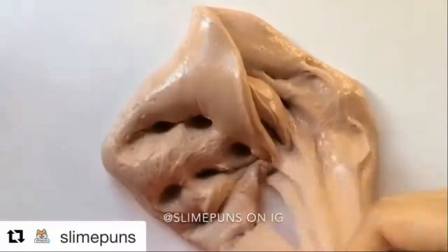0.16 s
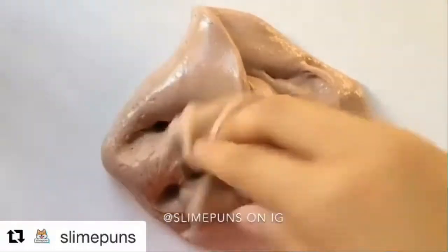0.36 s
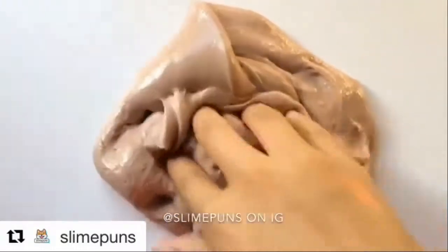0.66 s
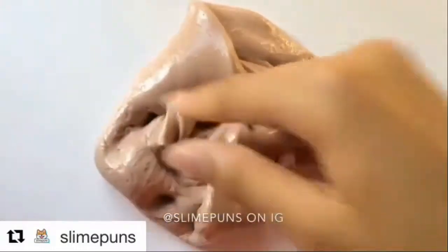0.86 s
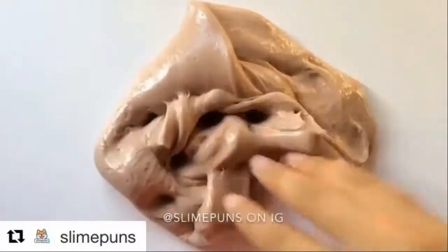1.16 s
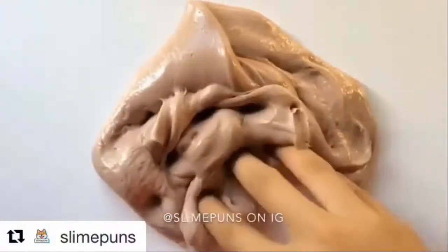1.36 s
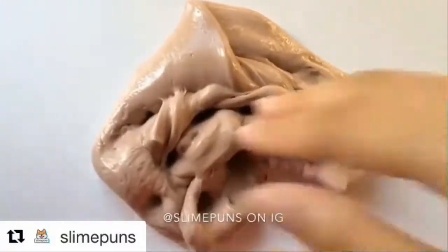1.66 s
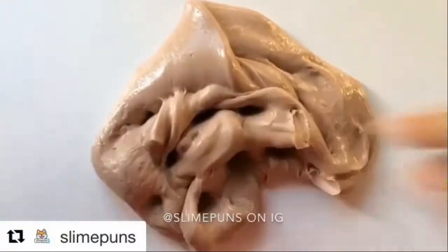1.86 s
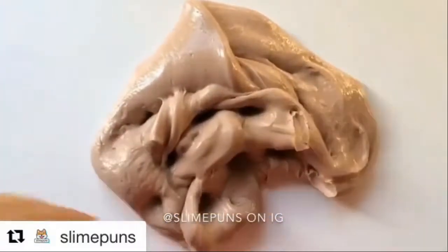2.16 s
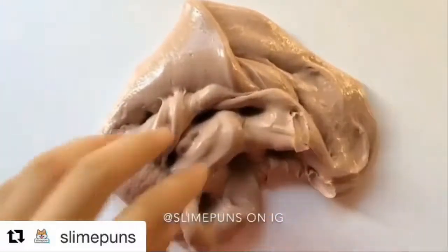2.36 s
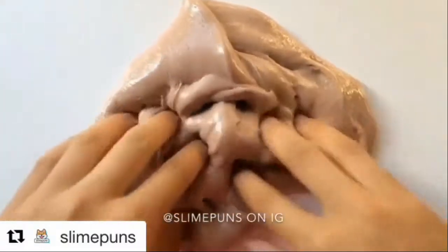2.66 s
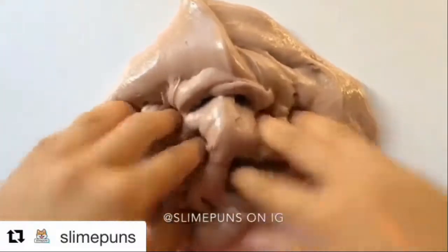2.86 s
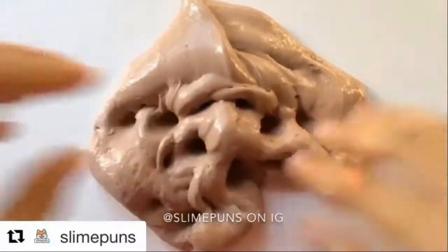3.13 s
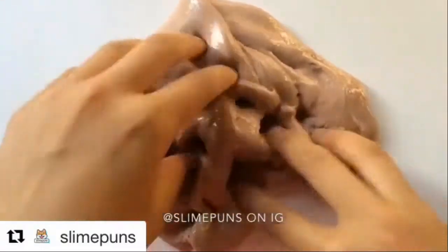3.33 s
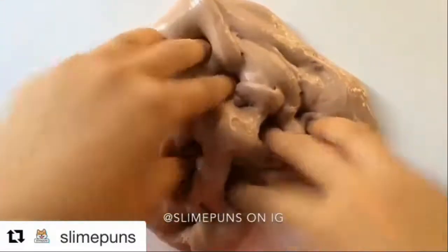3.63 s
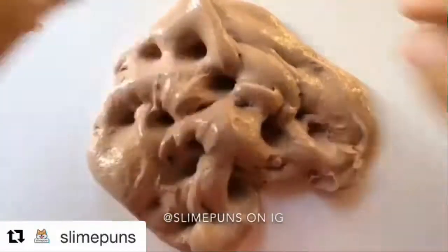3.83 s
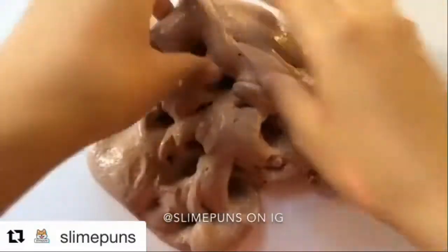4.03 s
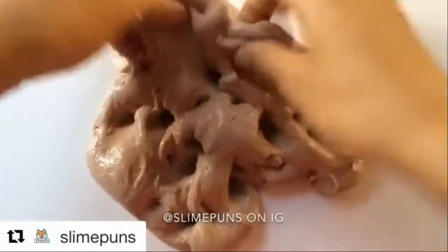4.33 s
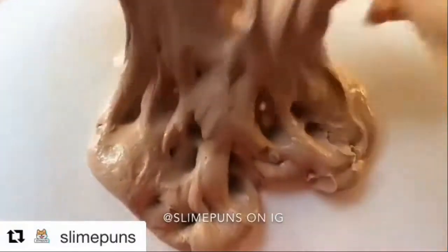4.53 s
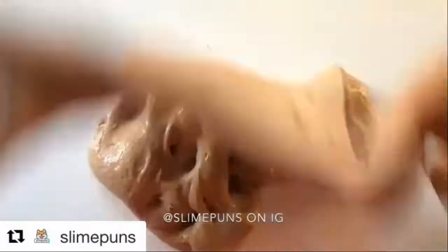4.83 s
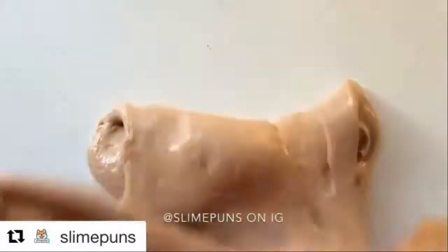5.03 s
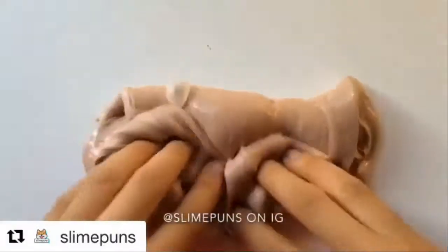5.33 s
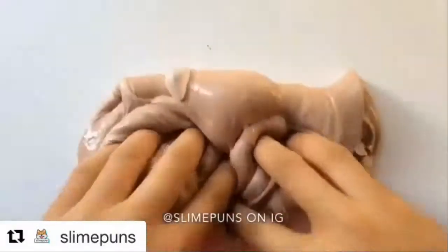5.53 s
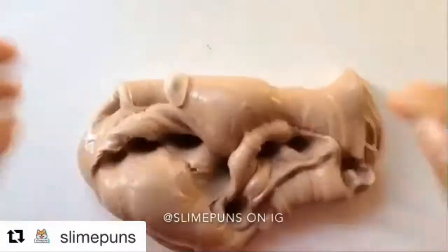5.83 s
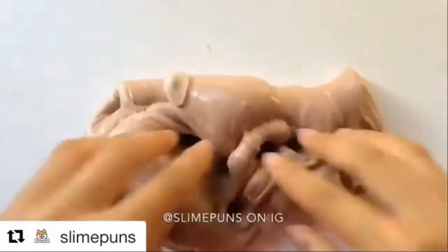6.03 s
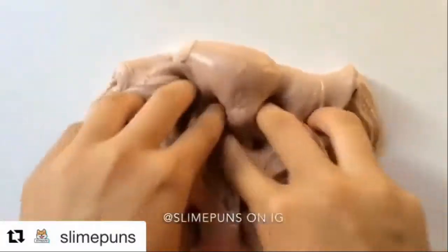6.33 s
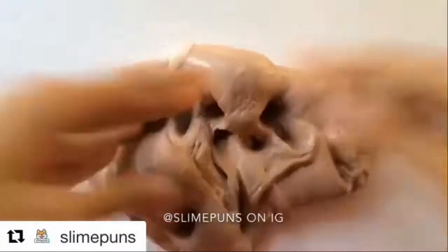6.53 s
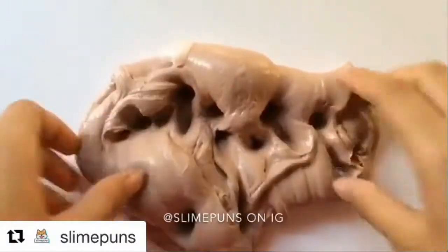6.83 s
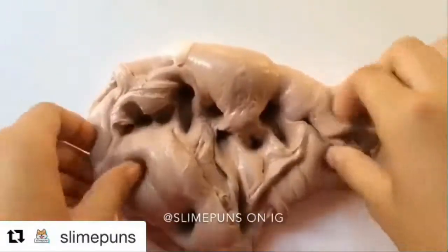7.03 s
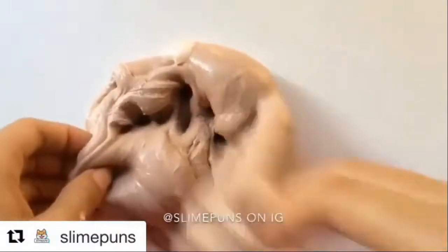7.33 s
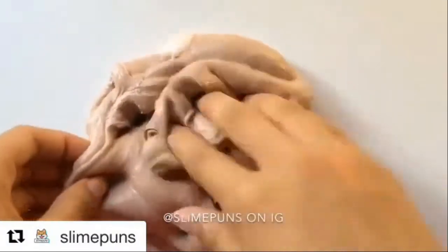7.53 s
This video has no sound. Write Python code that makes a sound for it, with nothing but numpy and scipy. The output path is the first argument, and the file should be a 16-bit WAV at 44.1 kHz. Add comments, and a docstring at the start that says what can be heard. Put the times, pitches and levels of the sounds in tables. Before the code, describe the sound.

Close wet snaps, plops and sticky crackles come in brief clusters as fingers squish dense slime, the loudest ending in a low thump.

```python
"""Air pockets burst in quick volleys as fingers poke, fold and stretch thick slime on a table.
Each pop is a film snap (damped ring plus noise) over a pocket plop (drifting damped rings).
Gulps are hollow rings with a noise gurgle; thuds are low rings; tears and smears are shaped clicks and bubbles.
A faint ring of something hard, a small room and quiet room tone lie behind, nearly mono."""
import sys
import numpy as np
from scipy import signal
from scipy.fft import rfft, irfft, next_fast_len
from scipy.io import wavfile
from scipy.ndimage import map_coordinates

SR = 44100
rng = np.random.default_rng(int(sys.argv[2]) if len(sys.argv) > 2 else 0)


def waveform_to_disk(signal):
    """Save audio, clipped to [-1, 1], as 16-bit WAV at the path in sys.argv[1]."""
    frames = np.transpose(np.atleast_2d(signal))
    scaled = np.clip(frames, -1, 1) * 32767
    samples = np.round(scaled).astype(np.int16)
    wavfile.write(sys.argv[1], SR, samples)


N = 338688  # samples


def amp(db):
    """Amplitude ratio of a level in dB."""
    return 10 ** (np.asarray(db) / 20)


def unit(x):
    """Scale to rms 1."""
    return x / np.sqrt(np.mean(x ** 2) + 1e-20)


def burst(x):
    """Scale to the energy of 1 ms at rms 1."""
    return x * np.sqrt(SR / 1000 / (np.sum(x ** 2) + 1e-20))


def along(points, hz):
    """Read (hz, value) points on a log frequency axis."""
    point_hz, value = np.transpose(points)
    return np.interp(np.log(hz + 1), np.log(point_hz + 1), value)


def filtered(x, response):
    """Multiply the spectrum of x by a function of frequency."""
    n = x.shape[-1]
    fft_size = next_fast_len(2 * n)
    spectrum = rfft(x, fft_size) * response(np.fft.rfftfreq(fft_size, 1 / SR))
    return irfft(spectrum, fft_size)[..., :n]


def coloured(x, spectrum):
    """Shape x by a (hz, level_db) curve, at rms 1."""
    return unit(filtered(x, lambda hz: amp(along(spectrum, hz))))


def add(track, start_s, sound):
    """Mix a sound into the track from start_s."""
    i = max(round(start_s * SR), 0)
    track[i:i + len(sound)] += sound[:max(N - i, 0)]


def ring(hz, t60_s, swell_s, drift_oct=0):
    """Damped resonance with a smooth swell; pitch glides drift_oct over the first 10 ms, then holds."""
    t = np.arange(SR // 4) / SR
    pitch_hz = hz * 2 ** (drift_oct * np.minimum(t * 100, 1))
    envelope = amp(-60 * t / t60_s) * (1 - np.exp(-t / swell_s)) ** 2
    return burst(np.sin(2 * np.pi * np.cumsum(pitch_hz) / SR) * envelope)


# room tone spectrum, relative: freq_hz, density_db_per_hz
FLOOR_SPECTRUM = [(15, -51), (25, -12.5), (50, -6.5), (129, -0.5), (286, -14), (414, -16.5), (498, -18.5),
                  (569, -19.5), (781, -19.5), (868, -22.5), (1100, -23), (2500, -26.5), (2940, -27),
                  (5120, -29.5), (14000, -32.5)]


def room_tone(wavers_per_s=7):
    """Faint hiss over a rumble whose level wavers a little."""
    tone = coloured(rng.standard_normal(N), FLOOR_SPECTRUM)
    rumble = filtered(tone, lambda hz: 1 / (1 + (hz / 400) ** 4))
    knots = rng.standard_normal(int(N * wavers_per_s / SR) + 4)
    waver = amp(1.3 * map_coordinates(knots, [np.arange(N) * wavers_per_s / SR]))
    return amp(-66.5) * (tone + (waver - 1) * rumble)


# room decay: freq_hz, t60_s
ROOM_DECAY = [(60, 0.49), (150, 0.43), (300, 0.15), (800, 0.15), (2000, 0.13), (6000, 0.1), (14000, 0.13)]
# room colour: freq_hz, gain_db
ROOM_COLOUR = [(40, -7.5), (120, 1), (300, -1.5), (700, -1), (1200, -0.5), (3000, -1.5), (7000, -2.5),
               (14000, 0.5)]


def room_tail(onset_s):
    """Diffuse answer of the walls: noise decaying per frequency, the bass lingering longest."""
    hz, t, bins = signal.stft(rng.standard_normal(SR // 2), SR, nperseg=256)
    decay = amp(-60 * t / along(ROOM_DECAY, hz)[:, None])
    tail = signal.istft(bins * decay, SR, nperseg=256)[1]
    tail = filtered(tail / np.linalg.norm(tail), lambda f: amp(along(ROOM_COLOUR, f)))
    return tail * (1 - np.exp(-np.arange(len(tail)) / SR / onset_s))


def room(x, count=16):
    """Room reverberation, with a new random tail for each equal time slice."""
    wet = np.zeros(N)
    for part in np.array_split(np.arange(N), count):
        add(wet, part[0] / SR, signal.fftconvolve(x[part], room_tail(onset_s=0.0035)))
    return wet


SYMPATHY_START_S = 1.473
# modes of something hard nearby: pitch_hz, level_db, t60_s
SYMPATHY_MODES = [(705, -57, .6), (786, -67, 2.6), (1712, -63, .9), (4724, -70, .5)]


def sympathy():
    """Something hard rings faintly in sympathy: damped sines starting together, cut at 2 s."""
    track = np.zeros(N)
    t = np.arange(2 * SR) / SR
    for pitch_hz, level_db, t60_s in SYMPATHY_MODES:
        add(track, SYMPATHY_START_S, amp(level_db - 60 * t / t60_s) * np.sin(2 * np.pi * pitch_hz * t))
    return track


# slabs slumping on the table and air puffed at the microphone: start_s, level_db (1 ms energy), pitch_hz, t60_s
THUD_EVENTS = [(0.805, -35.5, 112, 0.45), (1.14, -38.5, 189.5, 0.38), (1.479, -36, 135.8, 0.084),
               (1.69, -30.5, 109.6, .1), (3.078, -23.5, 115.2, 0.14), (3.655, -37, 117.7, 0.11),
               (3.868, -26.5, 85.5, 0.11), (4.665, -40, 130.6, 0.17), (4.699, -36.5, 75, 0.2),
               (6.6129, -5.5, 54.2, 0.08), (6.6258, -7.5, 99.3, 0.0054)]


def thuds():
    """Low blows, each one damped resonance."""
    track = np.zeros(N)
    for start_s, level_db, pitch_hz, t60_s in THUD_EVENTS:
        add(track, start_s, amp(level_db) * ring(pitch_hz, t60_s, swell_s=0.00029))
    return track


def bubbles(per_s, centre_hz, spread_db):
    """Stream of tiny bubbles: damped sines of random pitch and size, at rms 1."""
    track = np.zeros(N)
    draws = rng.standard_normal((int(per_s * N / SR), 3))
    for k, (late, size, pitch) in enumerate(draws):
        pitch_hz = centre_hz * np.exp(0.59 * np.clip(pitch, -2.5, 2.5))
        cycles = np.arange(SR // 50) * pitch_hz / SR
        blip = np.sin(2 * np.pi * cycles) * np.exp(-cycles / 3) * (1 - np.exp(-2 * cycles))
        add(track, (k + late) / per_s, amp(spread_db * min(size, 2)) * blip)
    return unit(track)


def grains(per_s, spread_db):
    """Single-sample clicks at random times, of very uneven size, at rms 1."""
    hits = rng.random(N) < per_s / SR
    size = amp(spread_db * np.minimum(rng.standard_normal(N), 2))
    return unit(hits * rng.choice([-1, 1], N) * size)


FADE_DB = 20  # span of attack_s and release_s


def strokes(rows, attack_s, sag_db_per_s):
    """Gain of finger strokes: builds up to start_s, sags as the slime yields, lets go after hold_s."""
    gain = np.zeros(N)
    for start_s, hold_s, level_db, release_s in rows:
        t = np.arange(N) / SR - start_s
        fade = np.maximum(-t, 0) / attack_s + np.maximum(t - hold_s, 0) / release_s
        gain += amp(level_db - sag_db_per_s * np.maximum(t, 0) - FADE_DB * fade)
    return gain


# fingers tear free: start_s, hold_s, level_db (before layer gains), release_s
TEAR_STROKES = [(.908, 0.023, -36.5, 0.11), (1.683, .033, -34.5, .035), (3.03, 0.09, -38, 0.069),
                (3.789, 0.075, -36.5, 0.044), (5.781, 0.074, -36.5, 0.065), (6.597, 0.082, -45, 0.067)]
TEAR_ATTACK_S, TEAR_SAG_DB_PER_S = 0.012, 15
# skin smears over slime: start_s, hold_s, level_db (before layer gains), release_s
SMEAR_STROKES = [(.15, 0.067, -63.5, 0.073), (.815, .025, -60.5, 0.096), (1.07, 0.065, -61.5, 0.085),
                 (2.71, 0.0038, -62, 0.029), (4.225, 0.014, -56, 0.031), (4.47, 0.081, -51.5, 0.045),
                 (4.68, 0.0085, -62.5, 0.033), (5.035, 0.042, -59.5, 0.079), (7.305, 0.038, -51.5, 0.082)]
SMEAR_ATTACK_S, SMEAR_SAG_DB_PER_S = 0.033, 13.5
# wet crackle of tearing, relative: freq_hz, density_db_per_hz
CRACKLE_SPECTRUM = [(100, -17), (350, 5.5), (750, 1), (1600, 0.5), (3000, -0.5), (6500, 0), (10000, -7.5),
                    (14000, -13.5)]
# wobbling mass, relative: freq_hz, density_db_per_hz
SHUDDER_SPECTRUM = [(30, -12.5), (60, -2), (130, 0.5), (250, -3.5), (500, -12), (1200, -30), (4000, -69)]
# smearing, relative: freq_hz, density_db_per_hz
SMEAR_SPECTRUM = [(200, -12), (500, -6), (1050, -2), (1400, -8), (2050, -2.5), (3000, -9.5), (5000, -10.5),
                  (14000, -16.5)]


def squelch():
    """Threads part as clicks, bubbles froth, and the released mass shudders as low noise."""
    pull = strokes(TEAR_STROKES, TEAR_ATTACK_S, TEAR_SAG_DB_PER_S)
    slide = strokes(SMEAR_STROKES, SMEAR_ATTACK_S, SMEAR_SAG_DB_PER_S)
    tearing = pull * coloured(grains(per_s=2000, spread_db=4), CRACKLE_SPECTRUM)
    shudder = pull * coloured(rng.standard_normal(N), SHUDDER_SPECTRUM)
    smearing = slide * coloured(grains(per_s=850, spread_db=5.5), SMEAR_SPECTRUM)
    froth = bubbles(per_s=170, centre_hz=1300, spread_db=4.5)
    frothing = (amp(-10) * pull + amp(-7.5) * slide) * froth
    return amp(-3) * tearing + amp(-2.5) * shudder + amp(-5.0) * smearing + frothing


# hollow, slower gulps, alone or under a pop:
# start_s, level_db (1 ms energy), pitch_hz, swell_s, t60_s, drift_oct_per_10ms
GULP_EVENTS = [(0.9730, -9, 1170, 0.0016, 0.011, -0.35), (1.060, -32, 444, 0.003, 0.073, -.07),
               (1.062, -36, 770, .0037, 0.072, -0.0031), (1.135, -50, 834, 0.0046, .043, .05),
               (1.152, -43, 1146, .0057, 0.031, -0.069), (1.195, -55.5, 1720, 0.0011, .025, 0),
               (1.4703, -12, 1090, 0.00089, 0.0099, -.36), (1.4710, -18, 729, 0.0028, .036, -0.22),
               (1.504, -27, 400, 0.0007, .035, -.1), (3.0778, -14, 741, 0.00036, 0.025, 0.036),
               (3.661, -52, 781, .002, .02, -.1), (4.196, -31, 380, .002, 0.026, 0.11),
               (4.197, -37, 2070, .0009, 0.0097, -0.042), (4.229, -40.5, 2110, 0.0026, .049, -0.031),
               (4.534, -39.5, 2040, 0.0017, 0.044, 0.023), (5.46, -41, 520, .0006, 0.0083, 0),
               (5.4605, -35.5, 2125, 0.00023, 0.0042, 0), (5.931, -49.5, 1350, 0.0018, 0.022, 0.021),
               (6.612, -22, 890, 0.00048, 0.013, 0), (6.992, -52, 426, .002, 0.046, -0.037)]
# gurgle noise, relative: multiple_of_pocket_pitch, density_db_per_hz
GURGLE_SPECTRUM = [(.1, -11), (.5, -4), (1, -3), (1.4, -7.5), (2.5, -24), (5, -39), (12, -47.5)]


def gulps():
    """Pockets swell into a hollow note and gurgle shut, with a soft low push."""
    track = np.zeros(N)
    t = np.arange(SR // 8) / SR
    for start_s, level_db, pitch_hz, swell_s, t60_s, drift_oct in GULP_EVENTS:
        add(track, start_s, amp(level_db) * ring(pitch_hz, t60_s, swell_s, drift_oct))
        spectrum = np.multiply(GURGLE_SPECTRUM, [pitch_hz, 1])
        gurgle = filtered(rng.standard_normal(len(t)), lambda hz: amp(along(spectrum, hz)))
        envelope = np.exp(-t / 0.016) * (1 - np.exp(-t / swell_s))
        add(track, start_s, amp(level_db - 5.0) * burst(gurgle * envelope))
        add(track, start_s, amp(level_db - 20.5) * ring(0.15 * pitch_hz, t60_s=0.014, swell_s=0.0008))
    return track


# snap noise, relative: freq_hz, density_db_per_hz
RIP_SPECTRUM = [(300, -11.5), (1500, -0.5), (3000, -1), (6500, 0.5), (10000, -0.5), (14000, -3)]


def rip(ragged, film_hz, lead_s):
    """Noise swells up to lead_s, then dies away; a ragged pop lasts longer, a low film_hz is duller."""
    t = np.arange(SR // 40) / SR - lead_s
    swelling = (0.59 + 0.78 * ragged) * np.exp(-np.abs(t) / (0.001 + 0.0011 * ragged))
    dying = np.exp(-np.abs(t) / (0.0013 + 0.0019 * ragged))

    def response(hz):
        return amp(along(RIP_SPECTRUM, hz)) / np.hypot(1, (hz / (3 * film_hz)) ** 2)

    hiss = filtered(rng.standard_normal(len(t)), response)
    return burst(hiss * np.where(t < 0, swelling, dying))


# spells of fingers pressing into the slime: start_s, end_s
KNEADING_SPELLS = [(0, 0.28), (2.7, 2.78), (4.4, 5.1), (5.4, 5.6), (6.3, 6.75), (7.45, 7.8)]
TINY_PER_S = 11
TINY_SNAP_DB, TINY_PLOP_DB, TINY_SPREAD_DB = -57, -64, 2.5
TINY_FILM_HZ, TINY_POCKET_HZ, TINY_SPREAD_OCT, TINY_RAGGED = 3574, 1427, 0.4, 0.7


def tiny_pops():
    """Rows of small pockets, in POP_EVENTS columns, scattered over each kneading spell."""
    rows = []
    for start_s, end_s in KNEADING_SPELLS:
        length_s = end_s - start_s
        count = max(round(length_s * TINY_PER_S), 1)
        for k in range(count):
            pop_s = start_s + length_s * (k + rng.random()) / count
            snap_db, plop_db = rng.normal([TINY_SNAP_DB, TINY_PLOP_DB], TINY_SPREAD_DB)
            film, pocket = 2 ** (TINY_SPREAD_OCT * rng.standard_normal(2))
            rows.append((pop_s, snap_db, TINY_FILM_HZ * film, TINY_RAGGED, plop_db, TINY_POCKET_HZ * pocket))
    return rows


# bursting air pockets: start_s, snap_db, film_hz, ragged (0-1), plop_db (before mode gains), pocket_hz
POP_EVENTS = [(0.152, -45.5, 4600, 0.44, -54, 960), (0.1654, -46, 9200, 0.5, -49, 1160),
              (0.2353, -54, 2200, 0.9, -54, 1980), (0.3642, -50, 3370, 0.3, -75, 900),
              (0.516, -54.5, 3400, .55, -62.5, 2000), (0.6604, -38, 9150, 0.12, -72.5, 900),
              (0.8029, -43, 10200, .4, -50.5, 1400), (0.8292, -51, 2806, 1, -46.5, 1250),
              (0.9031, -6, 6050, 0.2, -20.5, 1180), (0.9426, -19, 8300, 0.5, -19.5, 675),
              (0.9906, -19, 5270, 0.41, -15.5, 1873), (1.6802, -10.5, 6700, 0.13, -24.5, 1450),
              (1.6879, -13, 9600, .05, -24, 670), (1.716, -16, 3382, 0.57, -21.5, 996),
              (3.023, -34, 2160, 1, -20, 769.5), (3.0305, -7, 6800, .25, -18, 1950),
              (3.0422, -23, 3700, 0, -19.5, 700), (3.0684, -18, 9350, 0, -17.5, 1034),
              (3.0777, -10.5, 2140, .4, -19, 640), (3.0905, -15, 4570, .3, -22, 1140),
              (3.116, -10, 10930, 0.35, -18.5, 1100), (3.5725, -31.5, 4000, 0.06, -31.5, 2096),
              (3.7855, -7.5, 7000, 0.05, -29.5, 381), (3.7988, -21, 4600, 0.54, -19, 1080),
              (3.8154, -18, 5400, .2, -34, 870), (3.8214, -17.5, 4200, 0.1, -21.5, 914),
              (3.8236, -24.5, 5600, 0.66, -19, 1090), (3.8406, -34, 2700, 0.46, -18, 1340),
              (3.8468, -16, 3750, 0.25, -20, 715), (3.8685, -19, 7050, 0.51, -23.5, 717),
              (4.1975, -32, 4280, 0.53, -35, 376), (5.4619, -33.5, 2702, 0, -27.5, 1760),
              (5.63, -47.5, 3110, 0.47, -58, 991), (5.7326, -51.5, 4250, .8, -44, 723),
              (5.7672, -37.5, 2180, 1, -38, 1680), (5.7848, -7.5, 5970, 0.11, -18.5, 655),
              (5.8119, -9.5, 8630, .6, -15, 644), (5.839, -31, 2900, 0.77, -18, 1170),
              (5.854, -23, 3110, 0.17, -20.5, 658), (6.1886, -55, 7545, .6, -46, 660),
              (6.26, -43, 4080, 0.44, -76, 1545), (6.5925, -29.5, 6550, 0.34, -37.5, 601),
              (6.6116, -25, 5870, 0.7, -21.5, 726), (6.6246, -10.5, 6300, 0, -24.5, 464),
              (6.6258, -12, 3540, 0.55, -22, 381), (6.642, -15, 2220, 0.44, -20, 710),
              (6.6503, -11, 4150, 0.56, -14.5, 1085), (6.6637, -24, 4050, 0.6, -26.5, 1120),
              (6.6884, -18.5, 2685, .6, -26, 700), (7.4858, -53.5, 3560, 0.53, -75, 898),
              (7.5899, -51, 7400, 0.2, -51.5, 710)]


def pops():
    """Each burst rings the film amid noise, rings the pocket below and pushes out a little air."""
    track = np.zeros(N)
    lead_s = 0.007
    for start_s, snap_db, film_hz, ragged, plop_db, pocket_hz in list(POP_EVENTS) + tiny_pops():
        ragged = np.clip(ragged, 0, 1)
        noisy = np.clip(0.05 + 1.25 * ragged, 0, 0.95)  # share of snap energy in the noise
        film = ring(film_hz, t60_s=10 / film_hz, swell_s=0.5 / film_hz)
        add(track, start_s - 0.0001, amp(snap_db) * np.sqrt(1 - noisy) * film)
        add(track, start_s - lead_s, amp(snap_db) * np.sqrt(noisy) * rip(ragged, film_hz, lead_s))
        pocket = ring(pocket_hz, t60_s=7 / pocket_hz, swell_s=0.2 / pocket_hz, drift_oct=-0.084)
        add(track, start_s, amp(plop_db - 2.0) * pocket)
        # the pocket is no sphere: weaker, higher mode
        higher_mode = ring(pocket_hz * rng.uniform(1.4, 2.0), t60_s=0.004, swell_s=0.0001)
        add(track, start_s, amp(plop_db - 13.5) * higher_mode)
        air_push = ring(370, t60_s=0.0045, swell_s=0.00049)
        add(track, start_s, amp(plop_db - 11.0) * air_push)
    return track


def scene():
    """Slime, room and room tone, nearly mono, with a faint treble side signal."""
    slime = pops() + gulps() + squelch()
    blows = thuds()
    wet = amp(-8.5) * room(slime + amp(-15) * blows)
    mid = slime + blows + wet + sympathy() + room_tone()
    side = amp(-18) * filtered(room(slime), lambda hz: 1 / (1 + (4500 / (hz + 1)) ** 12))
    return np.array([mid + side, mid - side])


TOP_HZ = 14100


def record(dry):
    """Recorder overloads softly towards 0.85, cuts bass below 36 Hz and rolls off above TOP_HZ."""
    limited = dry / (1 + np.abs(dry / 0.85) ** 6) ** (1 / 6)
    thin = signal.sosfilt(signal.butter(4, 36, "highpass", fs=SR, output="sos"), limited)
    return filtered(thin, lambda hz: amp(-np.clip(hz - TOP_HZ, 0, 2400) / 20))  # 1 dB per 20 Hz


dry = scene()
out = record(dry)
waveform_to_disk(out)
```